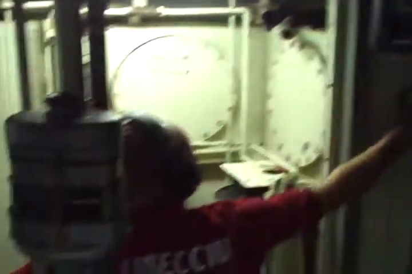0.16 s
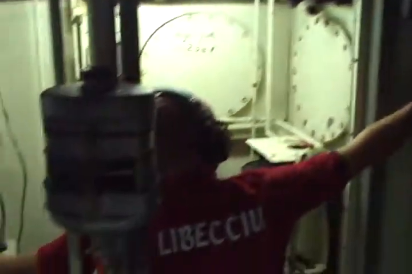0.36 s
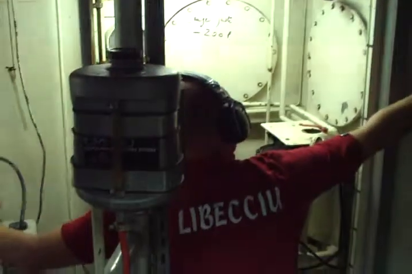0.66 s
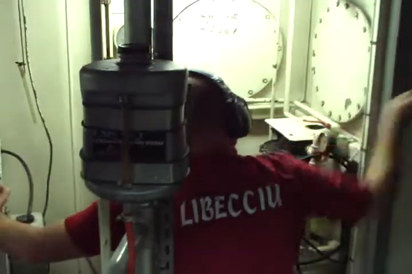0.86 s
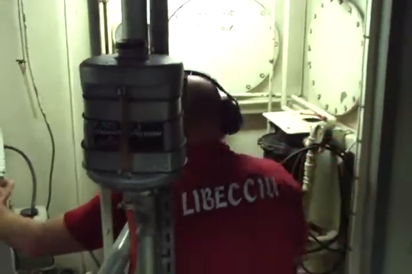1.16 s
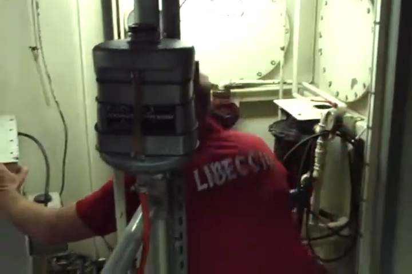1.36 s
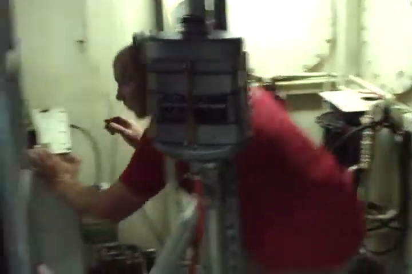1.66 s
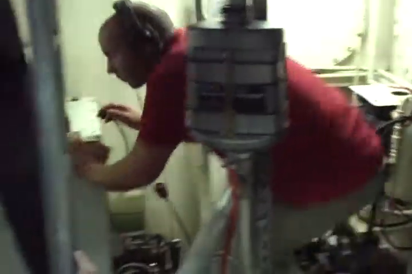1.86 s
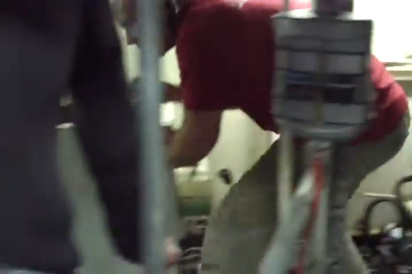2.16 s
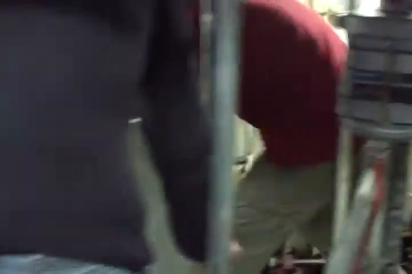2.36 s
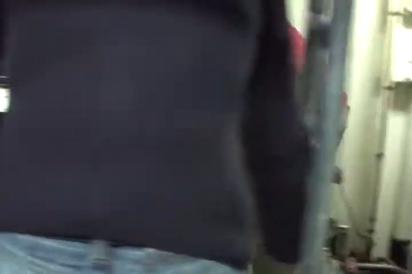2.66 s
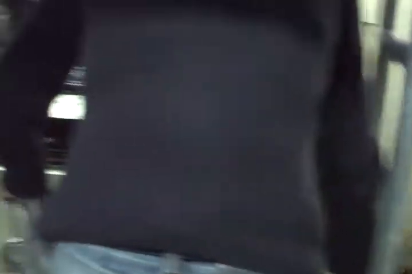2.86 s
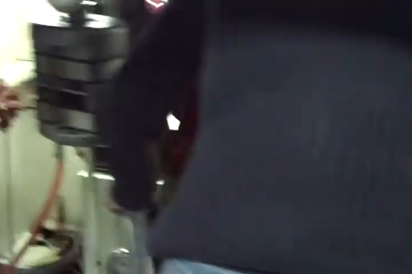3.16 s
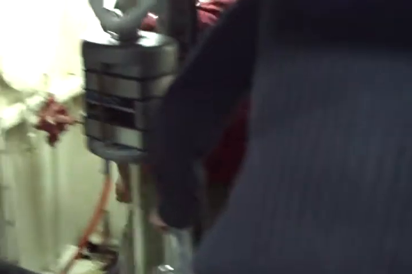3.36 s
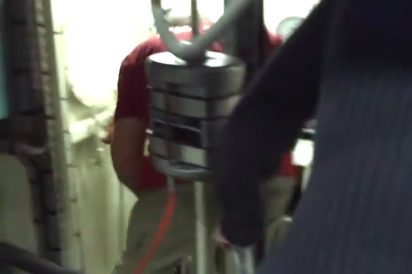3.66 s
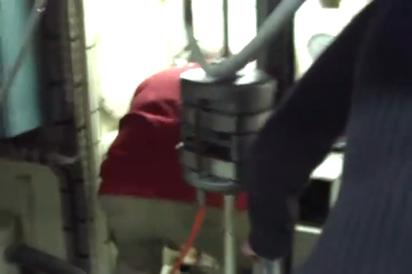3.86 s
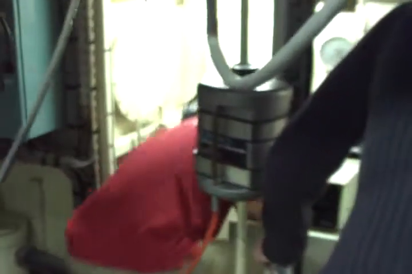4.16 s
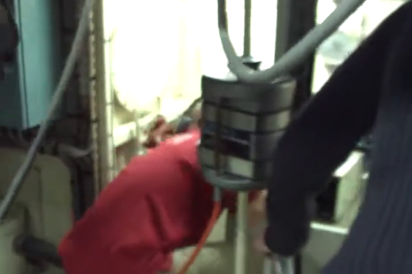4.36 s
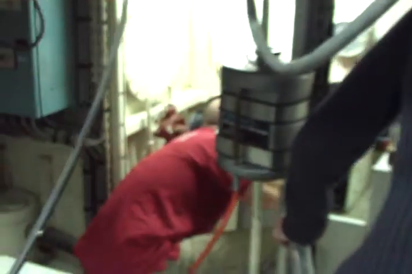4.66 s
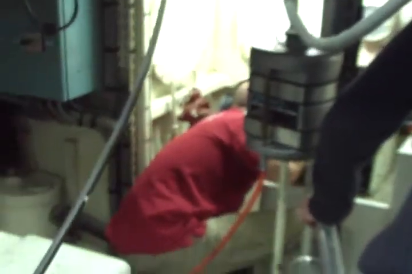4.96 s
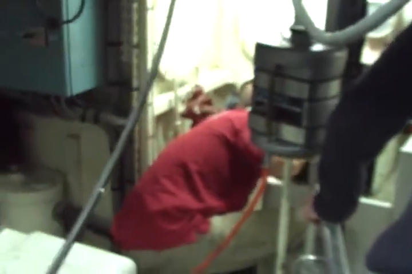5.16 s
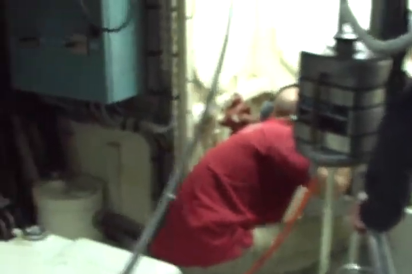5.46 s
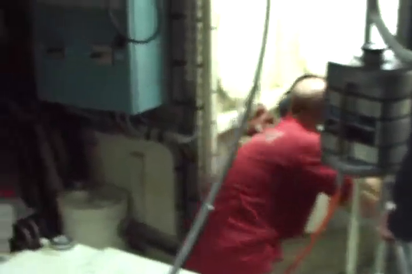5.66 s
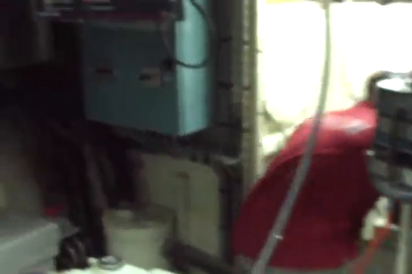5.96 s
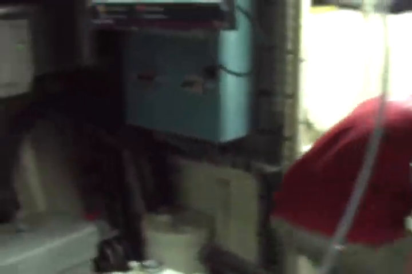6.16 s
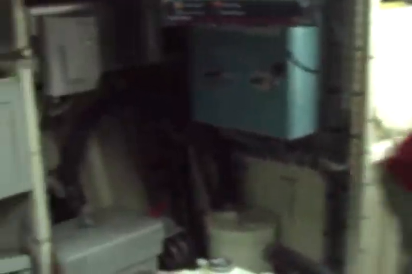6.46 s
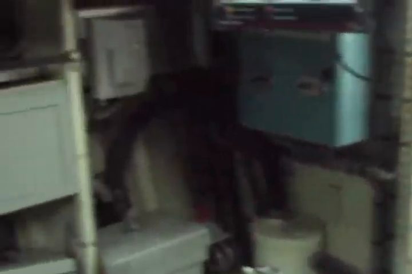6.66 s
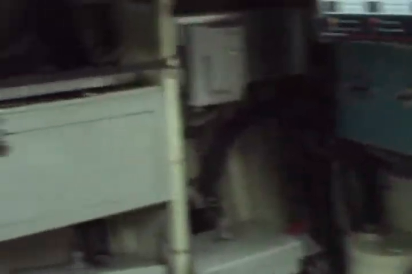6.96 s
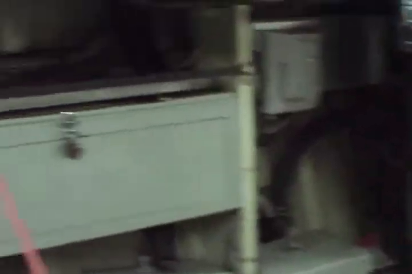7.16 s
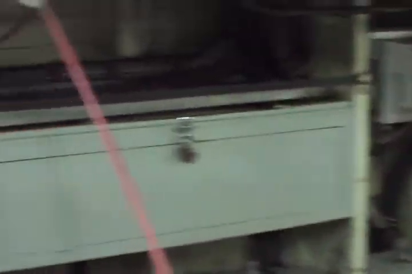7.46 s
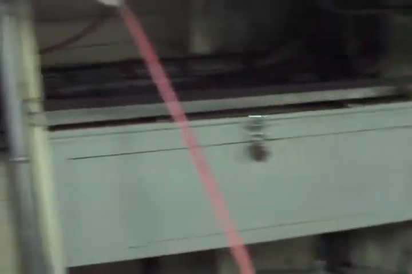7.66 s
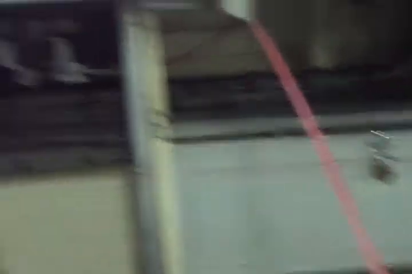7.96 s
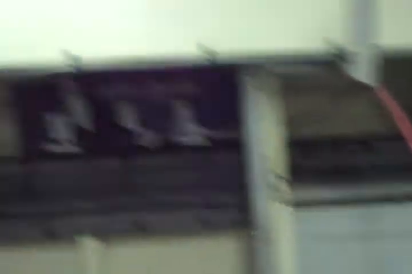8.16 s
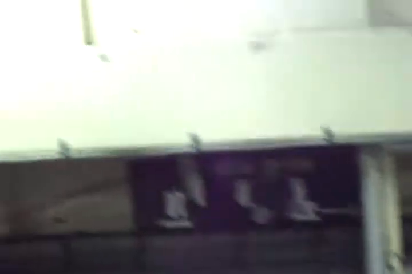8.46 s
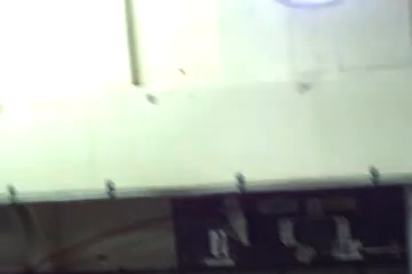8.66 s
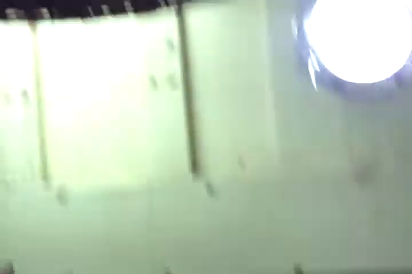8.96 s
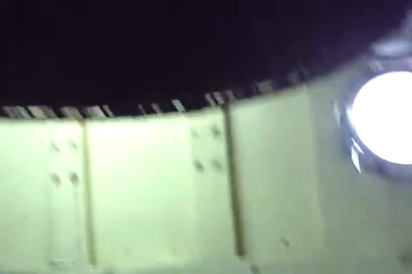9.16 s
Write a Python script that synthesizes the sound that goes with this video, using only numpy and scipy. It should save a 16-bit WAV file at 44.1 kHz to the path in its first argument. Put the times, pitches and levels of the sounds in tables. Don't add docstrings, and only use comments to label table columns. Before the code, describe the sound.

A big diesel runs at constant speed inside a cramped steel engine room. Its very fast knocks fuse into a rough, buzzing drone, joined by a geared pump's beating tone, valve clatter, injector hiss and roaring air. The colour shifts gently as the listener walks. A small overloaded handheld microphone flattens everything into dense, crunchy, dull-topped sound.

```python
import sys
import numpy as np
from scipy import signal
from scipy.fft import rfft, irfft
from scipy.io import wavfile
from scipy.ndimage import uniform_filter1d

SR = 44100
rng = np.random.default_rng(int(sys.argv[2]) if len(sys.argv) > 2 else 0)


def transcribe(signal):
    frames = np.atleast_2d(signal).T
    limited = np.clip(frames, -1, 1)
    pcm = np.round(limited * 32767).astype(np.int16)
    wavfile.write(sys.argv[1], SR, pcm)


def attenuation_scalar(level_db):
    decades = np.asarray(level_db, float) / 20
    return 10 ** decades


N = 411012

# frequency in Hz, density in dB.
ROAR_SPECTRUM = [(12, -35), (20, -4.5), (76, -5), (207, -10.5), (331, -2.5), (555, -6.5), (953, -4.5),
                 (1130, -4.5), (1250, -2), (4600, -16), (7170, -48), (9320, -77.5), (15800, -120)]
# time in seconds, place along in m, place across in m.
PATH = [(0.0, 1.186, 1.022), (0.55, 1.129, 0.997), (1.1, 1.11, 0.999), (1.64, 1.065, 0.96),
        (2.19, 1.058, 0.931), (2.86, 0.928, 0.868), (3.13, 0.878, 0.857), (4.15, 0.875, 0.845),
        (4.39, 0.79, 0.565), (4.6, 0.726, 0.562), (5.48, 0.753, 0.562), (5.79, 0.514, 0.5),
        (6.58, 0.5, 0.518), (7.1, 0.504, 0.758), (7.49, 0.558, 0.77), (8.0, 0.574, 0.795),
        (8.77, 0.537, 0.939), (9.32, 0.684, 0.923)]
# multiple of the cycle rate, level at a loop in dB,
# slant in degrees, loop along in m, loop across in m.
ENGINE_WAVES = [(3, -19.0, 66.8, 3.698, -0.147), (4, -13.1, 30.0, 1.981, 1.441),
                (6, -16.8, 55.2, 1.816, 0.267), (8, -23.0, 53.8, 0.232, 0.789),
                (9, -28.1, 57.6, 1.067, 0.651), (10, -30.7, 62.0, 1.155, 0.641),
                (11, -20.1, 5.5, 0.951, -1.728), (12, -21.4, 23.3, 0.701, 0.56),
                (13, -14.9, 87.5, -4.9, 0.702), (15, -18.9, 85.7, 4.073, 0.934),
                (16, -19.0, 80.9, -0.079, 0.856), (20, -19.4, 54.7, 1.096, 0.726),
                (22, -23.7, 16.1, 0.77, 0.74), (24, -25.4, 49.9, 0.996, 0.652),
                (27, -29.8, 9.5, 0.785, 0.953), (28, -18.4, 84.8, 2.408, 0.565),
                (30, -22.9, 82.9, 1.759, 0.614), (31, -17.0, 5.3, 0.939, -0.414),
                (32, -15.6, 39.9, 1.02, 0.721), (33, -19.7, 5.0, 1.018, -0.331),
                (34, -19.0, 3.6, 0.995, -0.705), (36, -15.6, 87.0, 2.582, 0.621)]
# multiple of the cycle rate, level at a loop in dB,
# slant in degrees, loop along in m, loop across in m.
BLOCK_WAVES = [(37, -21.6, 86.2, 1.987, 0.727), (38, -25.4, 66.7, 0.954, 0.78),
               (39, -25.1, 23.2, 0.877, 0.452), (40, -19.5, 75.5, 1.139, 0.732),
               (41, -26.6, 84.2, 0.836, 0.782), (42, -19.9, 1.7, 0.886, -1.779),
               (43, -23.0, 14.3, 0.937, 0.866), (44, -14.2, 69.9, 0.695, 0.689),
               (45, -16.2, 2.2, 0.986, 2.583), (46, -11.9, 5.5, 0.908, -0.098),
               (47, -17.4, 4.7, 0.914, -0.199), (48, -21.8, 81.0, 0.935, 0.627),
               (49, -20.3, 18.9, 0.916, 0.718), (50, -17.3, 60.5, 1.031, 0.647),
               (51, -23.2, 83.8, 1.509, 0.697), (52, -19.4, 85.1, 1.681, 0.651),
               (56, -25.0, 46.8, 0.932, 0.72), (57, -17.4, 88.0, 2.709, 0.709),
               (61, -25.4, 7.0, 0.915, 0.666), (64, -22.7, 50.9, 0.952, 0.664),
               (68, -21.4, 9.7, 0.955, 0.837), (69, -24.1, 80.1, 0.893, 0.718)]
# multiple of the pump rate, level at a loop in dB,
# slant in degrees, loop along in m, loop across in m.
PUMP_WAVES = [(3, -21.3, 74.8, -0.947, 0.98), (4, -22.8, 21.6, 1.005, 0.281),
              (6, -15.2, 50.0, 0.662, 0.996), (9, -22.0, 50.8, 0.734, 0.89)]
# multiple of the pump rate, level in dB.
PUMP_WEAK = [(11, -29), (12, -32.5), (18, -41.5), (21, -38)]
# multiple of the engine cycle rate, level in dB.
EXTRA_TONES = [(9.385, -32), (3.385, -41), (3.032, -35)]
# frequency in Hz, level in dB.
LOW_ORDER_LEVELS = [(21, -48), (45, -39), (110, -36), (350, -34), (520, -36), (800, -32), (1150, -34),
                    (1500, -33)]
# frequency in Hz, level in dB.
HIGH_ORDER_LEVELS = [(1500, -39.5), (1900, -36.5), (2300, -44), (3200, -46.5), (4500, -71)]
# place in the cycle 0-1, order it rings at, orders either side in step,
# moment it is heard whole in seconds.
BLOCK_KNOCK = (.22, 46, 3, 5.0)
# place in the cycle 0-1, order, orders in step, moment in seconds.
SMEARED_KNOCK = (0, 0, 0, 8.6)
ROUNDING_EDGES_HZ = (0, 400, 800, 1200, 1700, 2300, 3000, 3700, 4400, 5000, 5600, 6200, 6850, 7500, 22050)
# frequency in Hz, step over the band's rms in dB.
ROUNDING_STEPS = [(300, -10), (2000, -6), (4000, 0), (4700, 4), (5300, 8.5), (5900, 9.5), (6500, 10),
                  (7200, 11)]

CYCLE_HZ, HUNT_HZ = 21.521, .012
HUNT_PERIOD_S, HUNT_TOP_S = 3.35, 1.45
PUMP_GEAR, PUMP_LEAD = 2.60625, 1.644
SOUND_M_PER_S, NODE_FILL = 343, .2
GAP_ALONG_M, GAP_WIDTH_M = .8, .17


def evened(x):
    return x / np.sqrt(np.mean(abs(x) ** 2) + 1e-20)


def column(rows, t, index):
    rows = np.array(rows)
    return np.interp(t, rows[:, 0], rows[:, index])


def coloured(points):
    f, db = np.transpose(points)
    hz = np.fft.rfftfreq(N, 1 / SR)
    weight = attenuation_scalar(np.interp(np.log(hz + 1), np.log(f + 1), db))
    return evened(irfft(rfft(rng.standard_normal(N)) * weight, N))


def band(x, low_hz, high_hz):
    return signal.sosfilt(signal.butter(2, [low_hz, high_hz], "band", fs=SR, output="sos"), x)


def crank(t):
    hz = CYCLE_HZ + HUNT_HZ * np.cos(2 * np.pi * (t - HUNT_TOP_S) / HUNT_PERIOD_S)
    return 2 * np.pi * np.cumsum(hz) * (t[1] - t[0])


def eight_knocks():
    return 8 * crank(np.arange(N) / SR) / (2 * np.pi)


def uneven(turns, spread_db):
    return attenuation_scalar(spread_db * rng.standard_normal(8))[turns.astype(int) % 8]


def gap(t):
    return np.exp(-((column(PATH, t, index=1) - GAP_ALONG_M) / GAP_WIDTH_M) ** 2)


def roar():
    t = np.arange(N) / SR
    rumble = evened(band(rng.standard_normal(N), 203, 300))
    return attenuation_scalar(-13.5) * coloured(ROAR_SPECTRUM) + attenuation_scalar(-29 + 6 * gap(t)) * rumble


def injectors():
    t = np.arange(N) / SR
    turns = eight_knocks()
    strength = uneven(turns, 4.6)
    spits = (1.2 + strength * np.exp(-(turns % 1) / 0.73)) * rng.standard_normal(N)
    return attenuation_scalar(-28.5 + 3.0 * gap(t)) * evened(band(spits, 4400, 4850))


def clatter():
    turns = eight_knocks()
    strength = uneven(turns, 5.0)
    knocks = strength * np.exp(-(turns % 1) / .3) * rng.standard_normal(N)
    return attenuation_scalar(-27.0) * evened(band(knocks, 1500, 4200))


def drift(t, steady, per_s):
    knots = np.arange(0, t[-1] + 1, 1 / 20)
    hz, start = per_s * rng.standard_normal((6, 1)), rng.random((6, 1))
    g = steady + evened(np.exp(2j * np.pi * (hz * knots + start)).sum(0))
    g = evened(g) * np.exp(2j * np.pi * rng.random())
    return np.interp(t, knots, abs(g)), np.interp(t, knots, np.unwrap(np.angle(g)))


def drifting(t, angle, rows, steady, per_s):
    out = np.zeros(len(t))
    for k, db in rows:
        size, shift = drift(t, steady, per_s)
        out += attenuation_scalar(db) * size * np.cos(k * angle + shift)
    return out


def standing(t, angle, gear, rows, knock):
    place, centre, reach, whole_s = knock
    along, across = column(PATH, t, index=1), column(PATH, t, index=2)
    out = np.zeros(len(t))
    for k, db, slant, along_m, across_m in rows:
        wave = 2 * np.pi * k * gear * CYCLE_HZ / SOUND_M_PER_S * np.exp(1j * np.radians(slant))
        shape = np.cos(wave.real * (along - along_m)) * np.cos(wave.imag * (across - across_m))
        shape = shape + 1j * NODE_FILL
        turn = np.angle(shape) - np.interp(whole_s, t, np.angle(shape))
        smear = .67 * (abs(k - centre) > reach) * k * k
        out += attenuation_scalar(db) * abs(shape) * np.cos(k * (angle - 2 * np.pi * place) + smear + turn)
    return out


def pump_orders(t, angle):
    pump = PUMP_GEAR * angle
    loud = standing(t, pump + PUMP_LEAD, PUMP_GEAR, PUMP_WAVES, SMEARED_KNOCK)
    return attenuation_scalar(-0.28) * loud + drifting(t, pump, PUMP_WEAK, 0.74, 0.257)


def weak_orders(t, angle):
    low = np.setdiff1d(np.arange(1, 71), [row[0] for row in ENGINE_WAVES + BLOCK_WAVES])
    f, db = np.transpose(LOW_ORDER_LEVELS)
    low_db = np.interp(np.log(low * CYCLE_HZ), np.log(f), db) + 1.33 * rng.standard_normal(len(low))
    high = np.arange(71, 165)
    f, db = np.transpose(HIGH_ORDER_LEVELS)
    high_db = np.interp(high * CYCLE_HZ, f, db) + 1.8 * (high % 2 == 0)
    high_db += 2.1 * rng.standard_normal(len(high))
    tones = drifting(t, angle, [*zip(low, low_db), *EXTRA_TONES], 0.51, 0.3037)
    return tones + drifting(t, angle, zip(high, high_db), 0.33, 0.4545)


def orders():
    t = np.arange(N // 4 + 1) * 4 / SR
    angle = crank(t)
    tones = pump_orders(t, angle) + weak_orders(t, angle)
    tones += attenuation_scalar(-0.17) * standing(t, angle, 1, ENGINE_WAVES, SMEARED_KNOCK)
    tones += attenuation_scalar(0.2) * standing(t, angle, 0.99, BLOCK_WAVES, BLOCK_KNOCK)
    return attenuation_scalar(3.5) * signal.resample_poly(tones, 4, 1)[:N]


def scene():
    return (roar() + injectors() + clatter() + orders())[None]


def spectral_rounding(x, size=1024):
    n, k = np.arange(2 * size), np.arange(size // 2)
    window = np.sin(np.pi * (n + .5) / (2 * size))
    basis = window * np.cos(np.pi / size * np.outer(k + .5, n + .5 + size / 2))
    padded = np.pad(x, (size, 2 * size))
    starts = np.arange(len(x) // size + 2) * size
    c = padded[starts[:, None] + n] @ basis.T
    hz = (k + .5) * SR / (2 * size)
    which = np.searchsorted(ROUNDING_EDGES_HZ, hz) - 1
    member = which[:, None] == np.arange(len(ROUNDING_EDGES_HZ) - 1)
    rms = np.sqrt(uniform_filter1d(c ** 2, size=3, axis=0) @ member / member.sum(0))
    mid_hz = hz @ member / member.sum(0)
    step_db = np.interp(mid_hz, *np.transpose(ROUNDING_STEPS)) + 1.6 * rng.standard_normal(rms.shape)
    step = (rms * attenuation_scalar(step_db))[:, which] + 1e-9
    rounded = np.sign(c) * np.floor(abs(c) / step + .45) * step
    frames = rounded @ basis * 2 / size
    return (frames[1:, :size] + frames[:-1, size:]).ravel()[:len(x)]


def low_pass(x):
    return signal.sosfilt(signal.butter(12, 7320, fs=SR, output="sos"), x)


def record(dry):
    hot = attenuation_scalar(5.0) * dry / 0.64
    clipped = 0.59 * hot / (1 + abs(hot) ** 6) ** (1 / 6)
    coupled = signal.lfilter(*signal.butter(1, 9., "high", fs=SR), clipped) - .005
    dull = signal.sosfilt(signal.butter(7, 5720, fs=SR, output="sos"), coupled)
    mix = spectral_rounding(dull[0])[None]
    return low_pass(mix)


dry = scene()
out = record(dry)
transcribe(out)
```